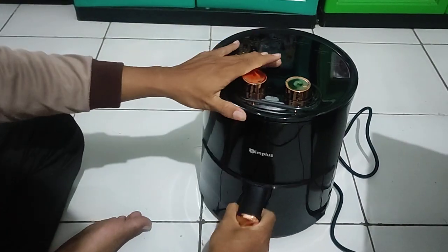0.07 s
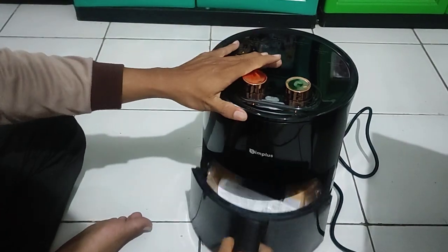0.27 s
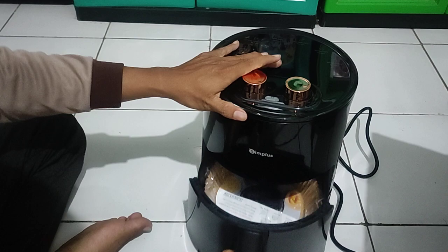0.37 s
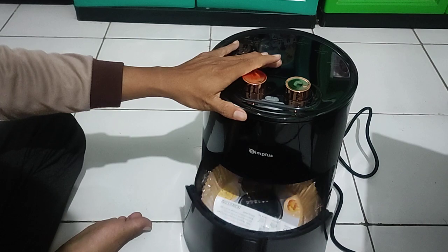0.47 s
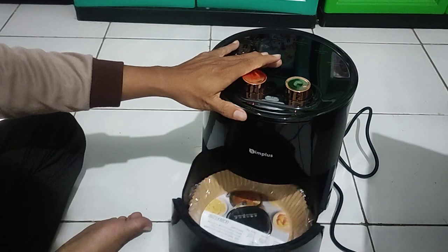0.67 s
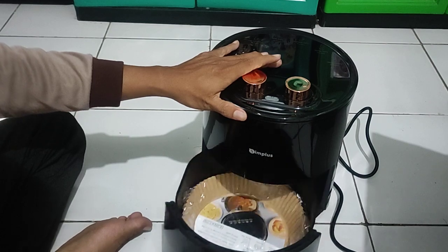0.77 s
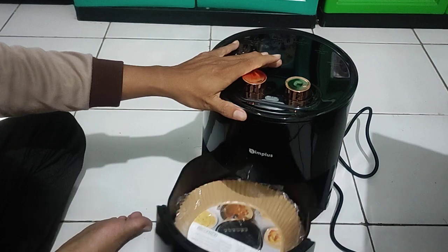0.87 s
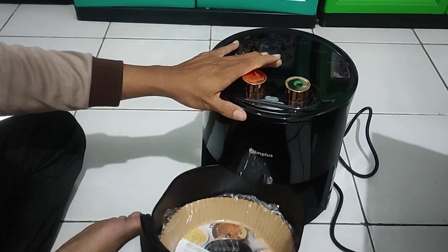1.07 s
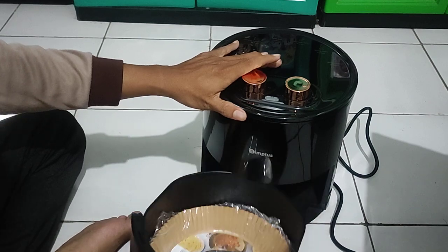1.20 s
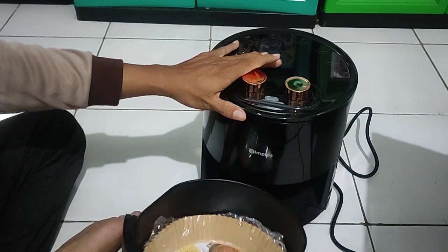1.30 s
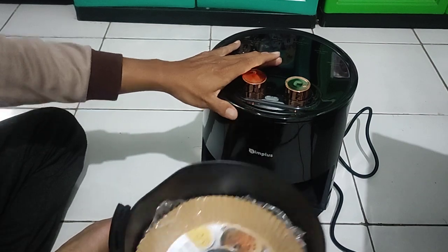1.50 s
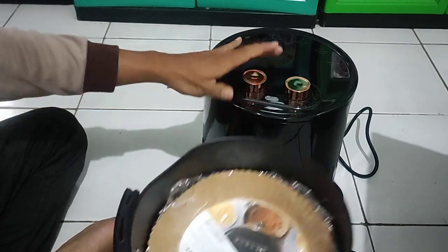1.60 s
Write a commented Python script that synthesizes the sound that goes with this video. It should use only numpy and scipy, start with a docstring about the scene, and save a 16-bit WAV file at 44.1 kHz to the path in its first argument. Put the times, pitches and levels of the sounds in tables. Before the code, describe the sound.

An air fryer basket clacks free, rattles out and knocks as it is lifted clear.

```python
"""Air fryer basket, pulled out

An air fryer on the tiled floor of a small room, heard close on one microphone. The basket clacks free
of its catch and judders out along the guides, making the hollow plastic housing boom. It scrapes on,
drops off the guides and knocks three more times as it is lifted clear; the metal pan rings faintly.
A low hum lies underneath."""
import sys
import numpy as np
from scipy import signal
from scipy.fft import rfft, irfft
from scipy.io import wavfile

SR = 44100
rng = np.random.default_rng(int(sys.argv[2]) if len(sys.argv) > 2 else 0)


def pcm_store(signal):
    """Save signal as 16-bit PCM."""
    levels = np.round(np.clip(np.atleast_2d(signal), -1, 1) * 32767)
    wavfile.write(sys.argv[1], SR, levels.astype(np.int16).T)


N = 72765
TIME = np.arange(N) / SR

# Modes of the hollow housing and of the pan's thin wall, rung by blows and by friction.
# Each row: pitch in Hz, relative level in dB, seconds to die away by 60 dB (t60).
HOUSING_MODES = [(144, -22, .12), (204, -6, 0.23), (218.3, -4, 0.26), (255.4, -7, 0.15), (325, -3.5, 0.26),
                 (384.3, -7.5, 0.2), (557.5, -14, 0.34), (620, -15, 0.14), (694, -24, .15)]
PAN_WALL_MODES = [(1454.5, -3.5, 0.1), (1545, -4.5, 0.11), (1667, -2.5, 0.08), (1844, -8, 0.14),
                  (2075, -11, 0.092), (2244, -10, 0.053), (3004, -5, 0.04), (3110, -11.5, 0.047),
                  (3296, -9, 0.087), (3450, -11.5, 0.047), (3886, -20, 0.11), (4250, -21, 0.053),
                  (5177, -17, 0.068), (5990, -15.5, 0.14)]


def from_db(db):
    """Decibels to gain."""
    return 10 ** (np.asarray(db) / 20)


def rms_one(x):
    """Scale to rms 1."""
    return x / np.sqrt(np.mean(x ** 2) + 1e-20)


def at_hz(points, hz):
    """Read rows of (Hz, value) on a log-frequency axis."""
    freqs, values = np.transpose(points)
    return np.interp(np.log(np.maximum(hz, 1)), np.log(freqs), values)


def level(curve):
    """Gain over time from rows of (seconds, dB)."""
    return from_db(np.interp(TIME, *np.transpose(curve)))


def colour(x, spectrum):
    """Shape a steady sound by rows of (Hz, dB); rms 1."""
    hz = np.arange(N // 2 + 1) * SR / N
    return rms_one(irfft(rfft(x) * from_db(at_hz(spectrum, hz)), N))


def add(out, start_s, sound):
    """Mix a sound in from its start time."""
    i = int(start_s * SR)
    out[i:i + len(sound)] += sound[:N - i]


def room_tone(air_db=-53, hum_hz=104.9, hum_db=-53.5, waver=.4):
    """Low room noise and a hum whose level wavers."""
    # Spectrum of the room noise. Each row: frequency in Hz, relative level in dB.
    air_spectrum = [(25, -21.5), (50, 1.5), (72, 10.5), (130, 3.5), (300, -10.5), (600, -10.5),
                    (1200, -21.5), (2500, -31), (4500, -48.5), (7200, -42.5)]
    drift = colour(rng.standard_normal(N), [(5, 0), (15, -15.5), (60, -71)])
    hum = np.sqrt(2) * np.sin(2 * np.pi * hum_hz * TIME) * (1 + waver * drift)
    air = colour(rng.standard_normal(N), air_spectrum)
    return from_db(air_db) * air + from_db(hum_db) * hum


def slips(per_second=5000, spread_db=2):
    """Tiny friction slips of uneven size at random moments."""
    sizes = from_db(spread_db * np.minimum(rng.exponential(1, N), 5))
    signs = rng.choice([-1, 1], N)
    return sizes * signs * (rng.random(N) < per_second / SR)


def ring(force, hz, t60):
    """One mode: a unit click sets a sine of height 1 ringing down."""
    decay, angle = from_db(-60 / (t60 * SR)), 2 * np.pi * hz / SR
    return signal.lfilter([0, np.sin(angle)], [1, -2 * decay * np.cos(angle), decay ** 2], force + 1e-18)


def rubbed(modes):
    """Modes kept ringing by friction slips; rms 1."""
    force = slips()
    tones = [from_db(db) * rms_one(ring(force, hz, t60)) for hz, db, t60 in modes]
    return rms_one(sum((-1) ** k * tone for k, tone in enumerate(tones)))


def sliding():
    """The pan slides on the guides: slips hiss, sing in its wall and drone in the housing."""
    # Course of the hiss, the singing and the drone. Each row: time in seconds, level in dB.
    hiss_curve = [(.19, -68), (.2, -48), (.22, -45), (.24, -41), (.28, -59.5), (.42, -43.5), (.5, -46.5),
                  (.6, -55.5), (.716, -61), (.722, -56.5), (.75, -48.5), (.815, -46), (.86, -62.5),
                  (.92, -71), (.96, -54), (1.05, -49), (1.09, -89), (1.2, -78.5)]
    sing_curve = [(.19, -70.5), (.24, -51), (.33, -52.5), (.45, -59), (.6, -61), (.716, -68.5),
                  (.724, -50.5), (.76, -52), (.82, -55), (.87, -71), (.93, -81), (1.03, -65.5),
                  (1.2, -76.5)]
    drone_curve = [(0, -66), (.17, -56), (.22, -30), (.3, -35.5), (.37, -32), (.41, -36.5), (.5, -49),
                   (.56, -52), (.62, -46.5), (.68, -47), (.73, -47.5), (.8, -40), (.86, -54), (1.2, -52.5),
                   (1.58, -61), (1.65, -48)]
    # Spectrum of the scraping hiss. Each row: frequency in Hz, relative level in dB.
    hiss_spectrum = [(600, -1), (1150, -5.5), (1600, -3.5), (2400, 0.5), (3150, -7.5), (3900, -8.5),
                     (5500, -10), (6300, 0), (7500, 2.5)]
    hiss = level(hiss_curve) * colour(slips(), hiss_spectrum)
    sing = level(sing_curve) * rubbed(PAN_WALL_MODES)
    drone = level(drone_curve) * rubbed(HOUSING_MODES)
    return hiss + sing + drone


def judder(pitch_hz=220.2, wander_depth=.059, db_per_octave=-21):
    """The tight basket sticks and slips in its guides, near the pitch of a strong housing mode."""
    # Course of the judder. Each row: time in seconds, level in dB.
    judder_curve = [(.19, -57.5), (.21, -37), (.23, -19), (.262, -28), (.285, -20), (.306, -12.5),
                    (.325, -38.5), (.35, -27.5), (.383, -32), (.402, -50), (.47, -60.5)]
    wander = colour(rng.standard_normal(N), [(10, -42), (40, 10), (90, 1), (200, -47)])
    phase = 2 * np.pi * np.cumsum(pitch_hz * (1 + wander_depth * wander)) / SR
    buzz = sum(from_db(db_per_octave * np.log2(k)) * np.sin(k * phase) for k in range(1, 6))
    return level(judder_curve) * rms_one(buzz)


def struck(modes, gains_db):
    """One blow rings each mode as a decaying sine; one second long."""
    t = TIME[:SR]
    return sum(from_db(db + gain_db - 60 * t / t60) * np.sin(2 * np.pi * hz * t)
               for (hz, db, t60), gain_db in zip(modes, gains_db))


def favour(hz, favoured_hz, lift_db, octaves):
    """Lift in dB that the point of contact gives the modes round one pitch."""
    distance = np.log2(np.maximum(hz, 1) / favoured_hz)
    return lift_db * np.exp(-.5 * (distance / octaves) ** 2)


def dense_modes(db_at, t60s, size):
    """Countless close modes as third-octave bands that die by rows of (Hz, t60); starts at rms 1."""
    hz, t = np.arange(size // 2 + 1) * SR / size, np.arange(size) / SR
    edges = 90 * 2 ** (np.arange(21) / 3)
    centres = np.sqrt(edges[1:] * edges[:-1])
    spectrum = from_db(db_at(hz)) * np.exp(2j * np.pi * rng.random(len(hz)))
    bands = np.array([irfft(spectrum * (hz >= lo) * (hz < hi), size) for lo, hi in zip(edges, edges[1:])])
    decay = from_db(-60 * t / at_hz(t60s, centres)[:, None])
    return (bands * decay).sum(0) / bands.sum(0).std()


def knocks(rise_s=.0011):
    """Each contact booms in the housing, rings the pan, clacks the plastic and clinks the pan's wall."""
    # The basket's contacts. Each row: start in seconds, boom, pan ring and clink levels in dB,
    # pitch favoured by the point of contact in Hz, clack level in dB, clack tilt in dB per octave.
    contacts = [(0.1979, -30, -47.5, -50, 1000, -34, -1), (0.214, -30, -36.5, -42.5, 848, -27.5, 0.5),
                (0.231, -39.5, -35.5, -43, 500, -26.5, 1.5), (0.242, -27, -40.5, -50.5, 950, -30.5, 1.5),
                (0.265, -24, -38.5, -55, 420, -33, 0), (0.277, -31.5, -32.5, -49.5, 800, -31.5, -1.5),
                (0.2996, -23, -43.5, -39.5, 1510, -27.5, 0), (0.322, -26, -29.5, -60, 656, -33.5, -0.5),
                (0.341, -25.5, -40, -49, 321, -45, 3.5), (0.366, -29, -35.5, -46.5, 401, -39, 2),
                (0.7213, -25.5, -30, -37.5, 400, -35, 0.5), (0.757, -32.5, -39, -55.5, 380, -52, 1.5),
                (0.9296, -41, -22, -45.5, 792, -22, -3), (0.949, -33, -29, -57, 430, -18.5, -5),
                (0.961, -28.5, -30, -52.5, 480, -42, 1), (1.244, -43.5, -22, -49, 390, -24.5, -3),
                (1.362, -46, -23, -60, 506, -28, -3)]
    # Modes of the metal pan. Each row: pitch in Hz, relative level in dB, t60 in seconds.
    pan_modes = [(323.7, 4.5, 0.13), (400.9, -6, 0.12), (420, -17.5, 0.097), (492, -12.5, 0.32),
                 (590.4, -12.5, 0.18), (655, -8, 0.099), (682, -13, 0.24), (748, -15, 0.19),
                 (767, -10, 0.078), (848, -12.5, 0.11), (875, -27, 0.89), (930.5, -24, 0.19),
                 (1058, -28.5, 0.23)]
    # Spectrum of the plastic's dense modes. Each row: frequency in Hz, relative level in dB.
    clack_spectrum = [(130, -14.5), (300, -2), (550, 5.5), (850, 2.5), (1200, -7.5), (1800, -9.5),
                      (2600, -14.5), (4200, -28), (5600, -25), (7200, -18)]
    # Their quick damping. Each row: frequency in Hz, t60 in seconds.
    clack_t60 = [(200, 0.23), (900, 0.088), (2500, 0.16), (7000, 0.15)]
    out = np.zeros(N)
    rise = 1 - np.exp(-TIME[:SR] / rise_s)
    for start_s, boom_db, pan_db, clink_db, favoured_hz, clack_db, tilt in contacts:
        def clack_shape(hz):
            lift = favour(hz, favoured_hz, lift_db=10.5, octaves=.15)
            return at_hz(clack_spectrum, hz) + tilt * np.log2(hz + 1) + lift

        pan_lifts = [favour(hz, favoured_hz, lift_db=13, octaves=.066) for hz, _, _ in pan_modes]
        blow = struck(HOUSING_MODES, [boom_db] * len(HOUSING_MODES))
        blow += struck(pan_modes, pan_db + np.array(pan_lifts))
        add(blow, 0, from_db(clack_db) * dense_modes(clack_shape, clack_t60, size=8192))
        blow += struck(PAN_WALL_MODES, clink_db + rng.normal(0, 1.8, len(PAN_WALL_MODES)))
        add(out, start_s, blow * rise)
    return out


def latch(start_s=.215, level_db=-21, t60=.022):
    """The plastic catch opens with one short, hard snap."""
    # Spectrum of the snap. Each row: frequency in Hz, relative level in dB.
    snap_spectrum = [(400, 1.5), (1200, 6.5), (1950, 14), (2700, -16.5), (4400, -21), (7200, -16)]
    snap = dense_modes(lambda hz: at_hz(snap_spectrum, hz), [(1000, t60)], size=4096)
    out = np.zeros(N)
    add(out, start_s, from_db(level_db) * snap)
    return out


def room(direct, level_db=-7, shortest_s=.0113, longest_s=.0417):
    """Sound circles between tiles and walls on paths of unrelated length, scattering as it goes."""
    # Reverberation of the tiled room. Each row: frequency in Hz, t60 in seconds.
    room_t60 = [(150, 0.18), (500, 0.32), (2000, 0.42), (7000, 0.64)]
    hz = np.arange(N + 1) * SR / (2 * N)
    delay = lambda s: np.exp(-2j * np.pi * hz * s)
    paths_s = np.geomspace(shortest_s, longest_s, 14)
    loops = [from_db(-60 * s / at_hz(room_t60, hz)) * delay(s) for s in paths_s]
    tail = sum((-1) ** k * loop / (1 - loop) for k, loop in enumerate(loops))
    for s in (.0013, .0031, .0047):   # all-pass stages scatter the echoes
        tail = tail * (delay(s) - .5) / (1 - .5 * delay(s))
    return from_db(level_db) * irfft(rfft(direct, 2 * N) * tail / np.std(tail))[:N]


def scene(low_cut_hz=138):
    """At the microphone: the fryer, with its lowest bass cut away, its echoes and room tone."""
    low_cut = signal.butter(4, low_cut_hz, "high", fs=SR, output="sos")
    fryer = signal.sosfilt(low_cut, latch() + knocks() + sliding() + judder())
    return (fryer + room(fryer) + room_tone())[None]


def record(dry, cutoff_hz=7560):
    """The top end is cut steeply."""
    return signal.sosfilt(signal.ellip(12, .3, 70, cutoff_hz, fs=SR, output="sos"), dry)


dry = scene()
out = record(dry)
pcm_store(out)
```